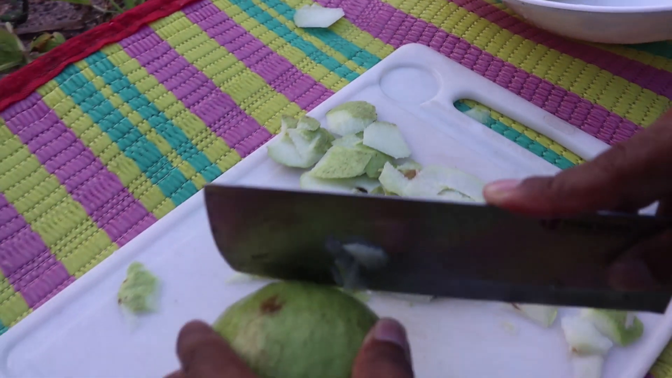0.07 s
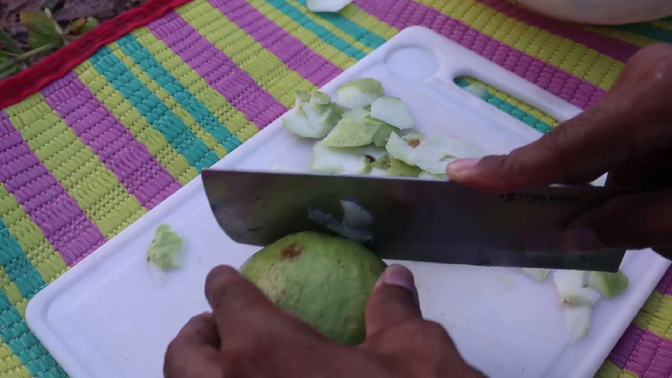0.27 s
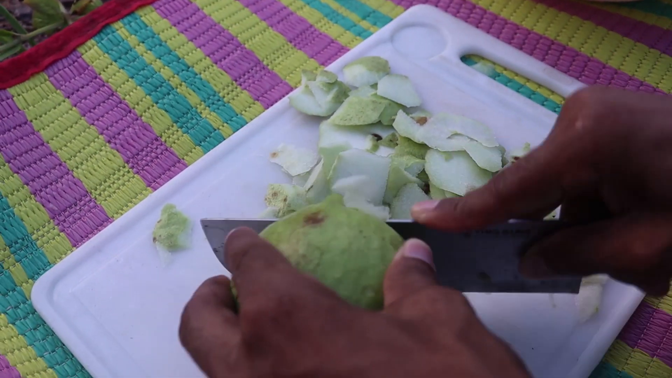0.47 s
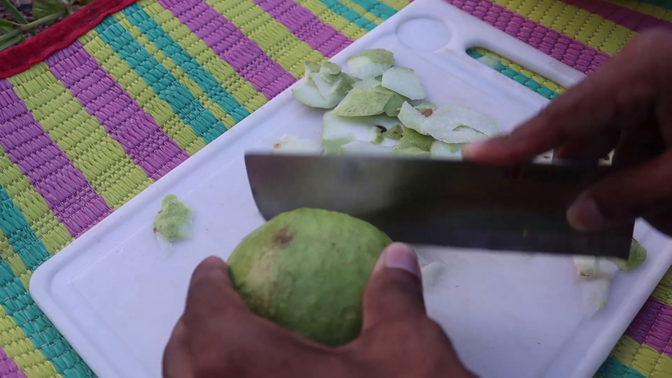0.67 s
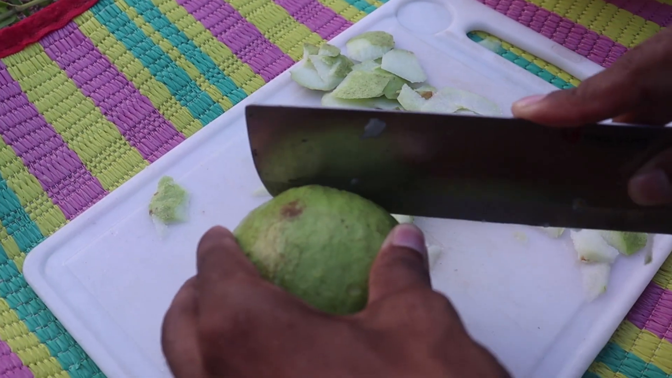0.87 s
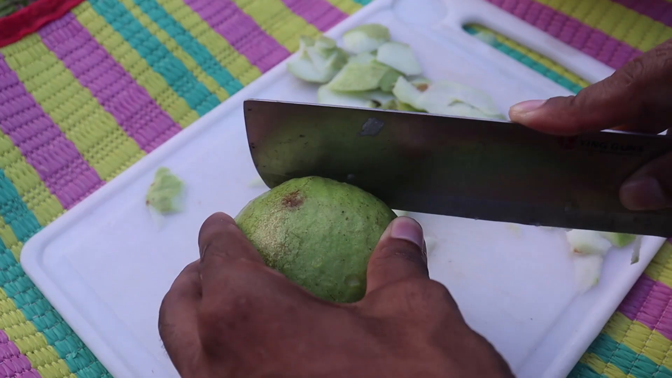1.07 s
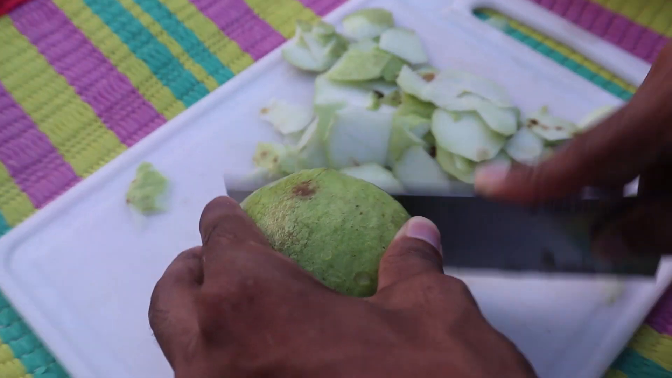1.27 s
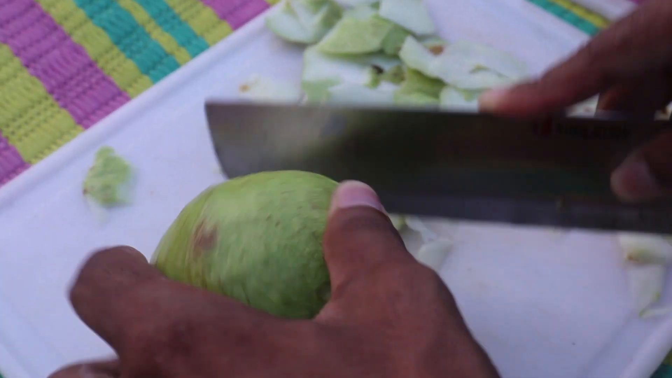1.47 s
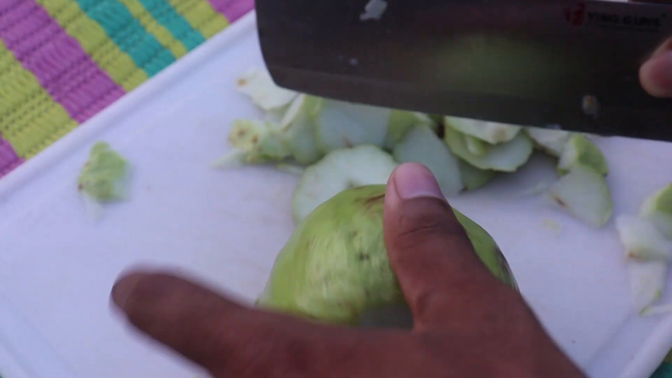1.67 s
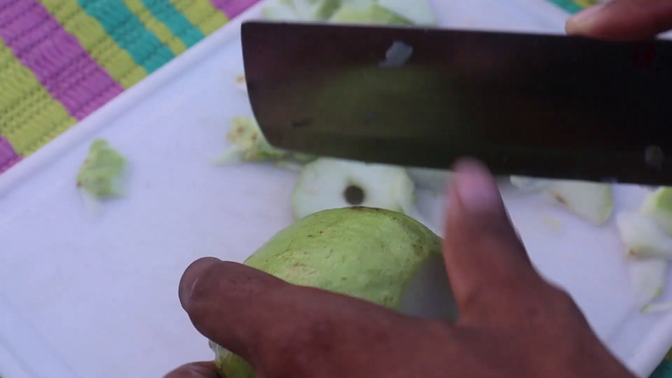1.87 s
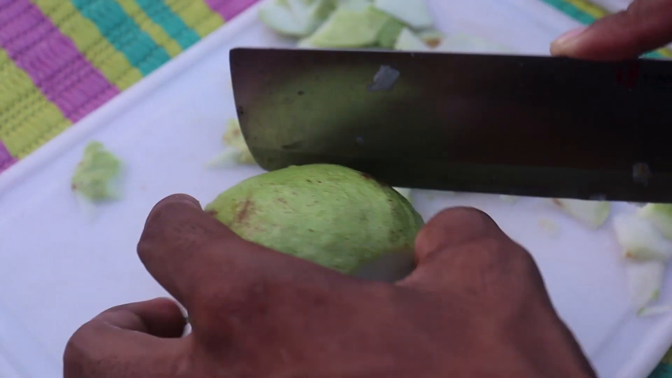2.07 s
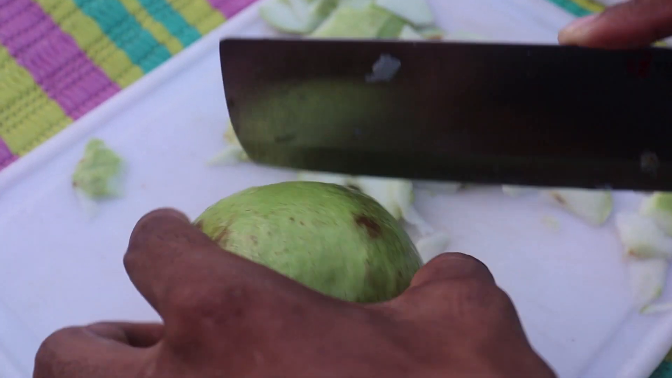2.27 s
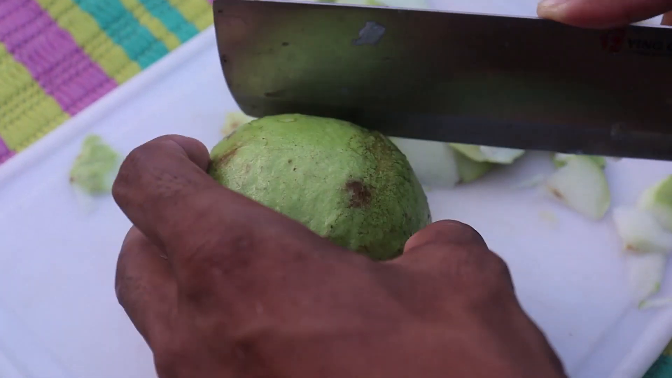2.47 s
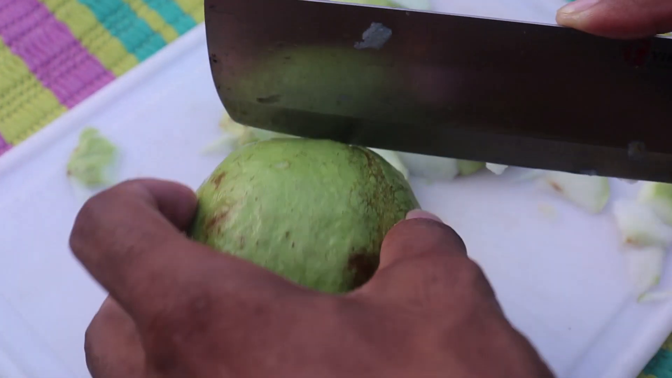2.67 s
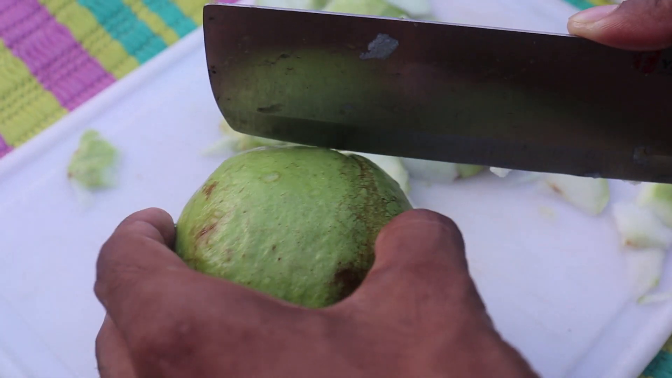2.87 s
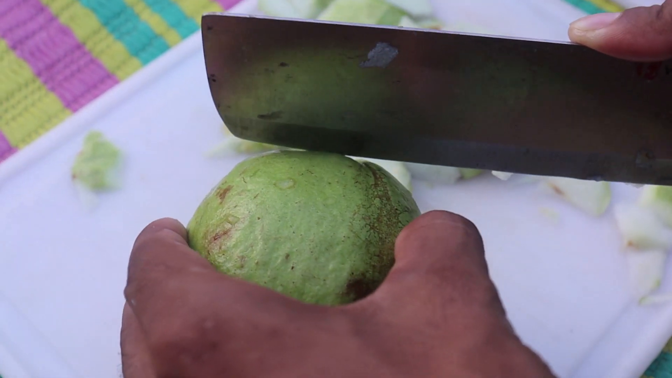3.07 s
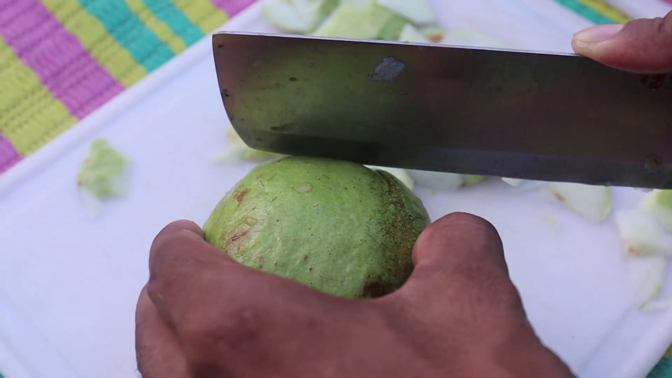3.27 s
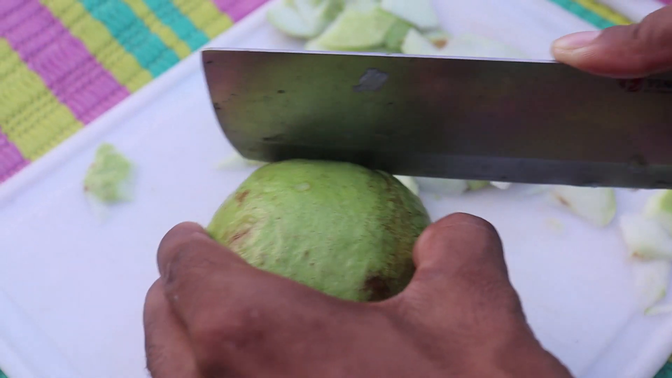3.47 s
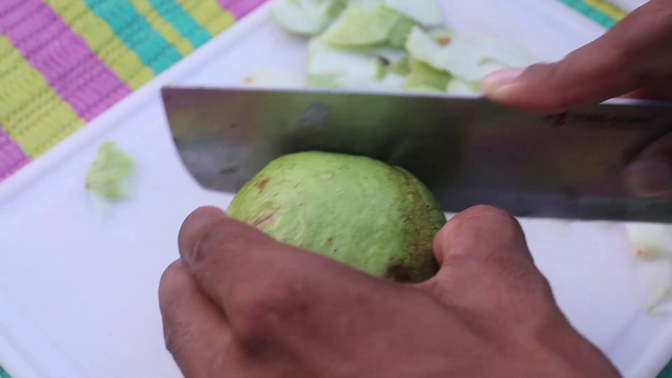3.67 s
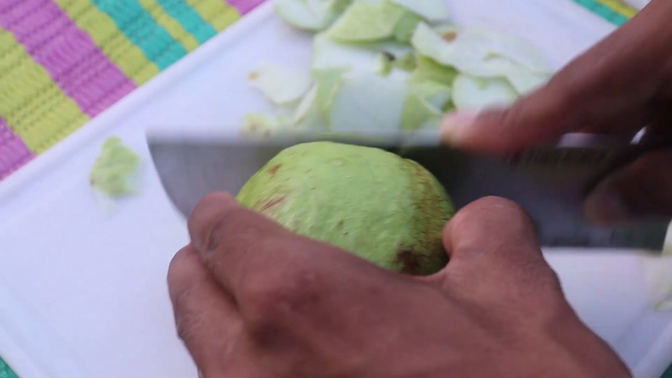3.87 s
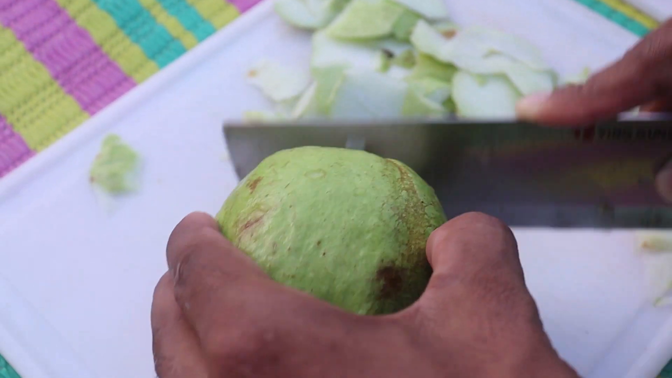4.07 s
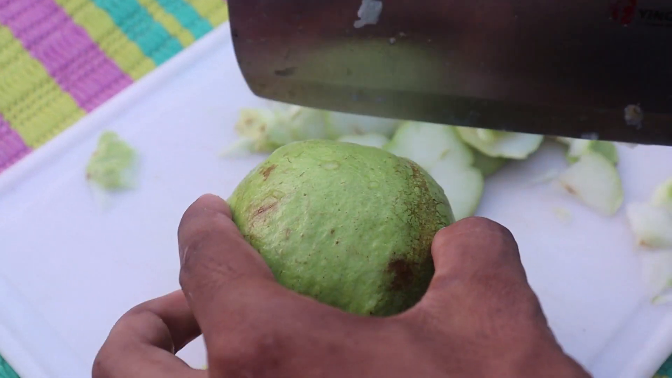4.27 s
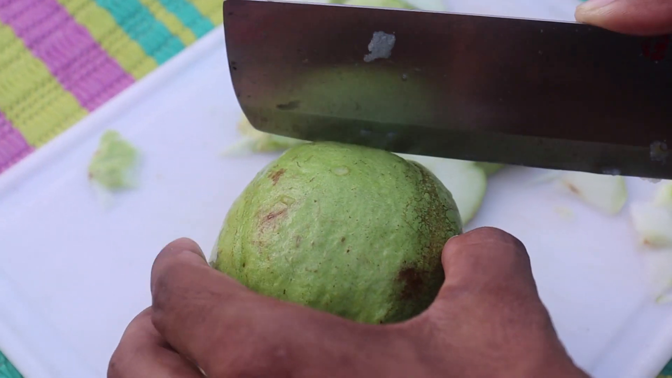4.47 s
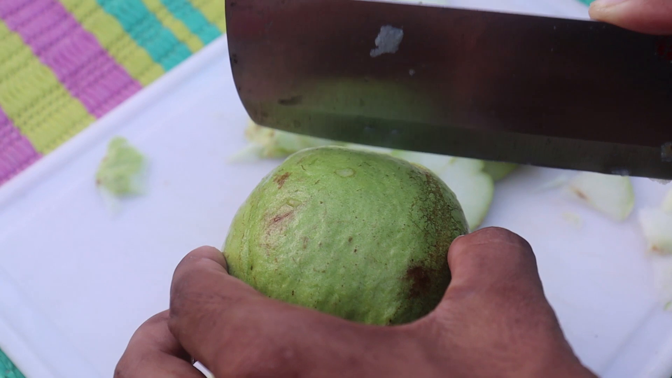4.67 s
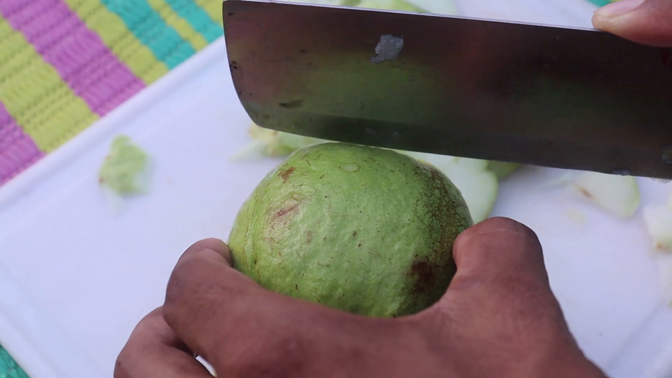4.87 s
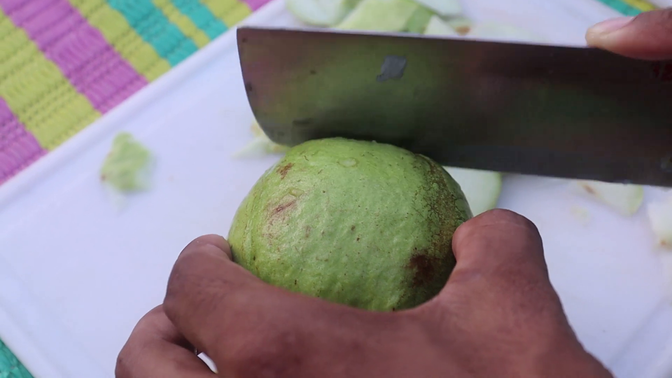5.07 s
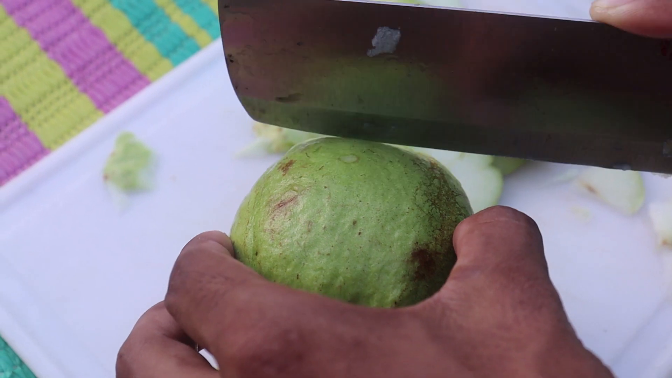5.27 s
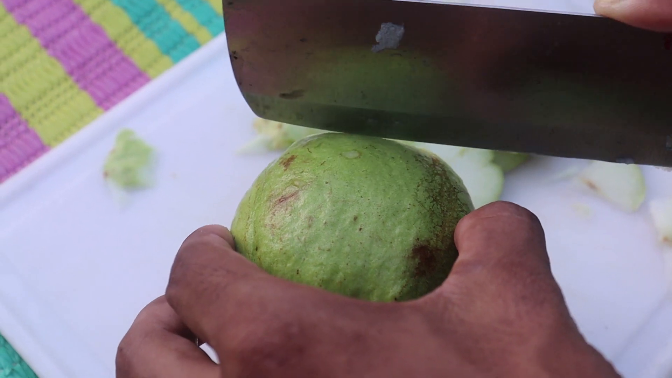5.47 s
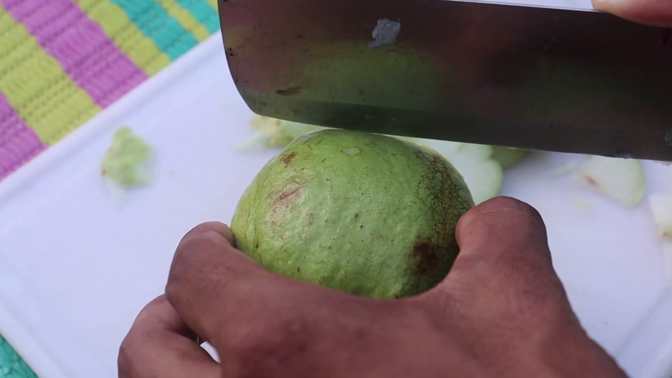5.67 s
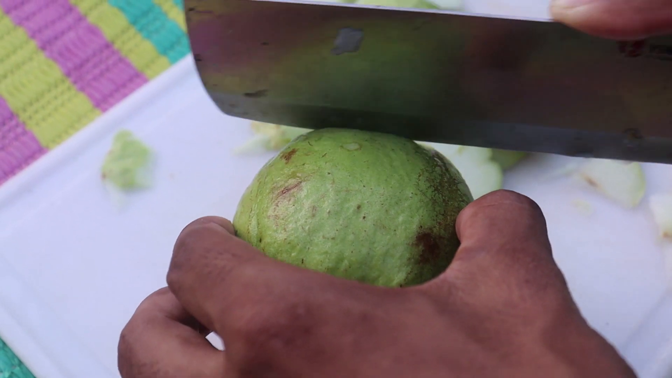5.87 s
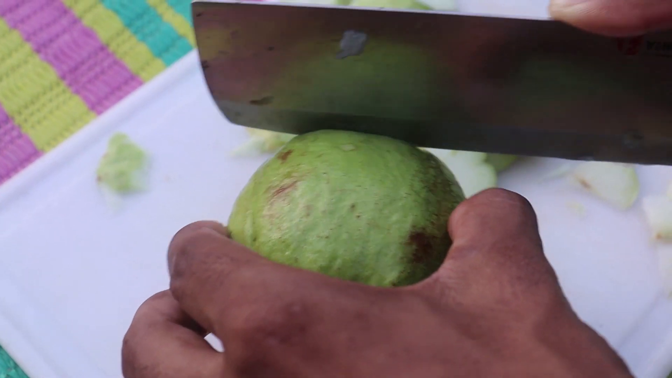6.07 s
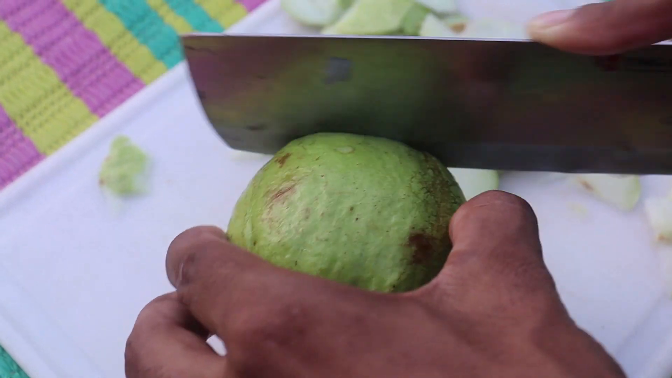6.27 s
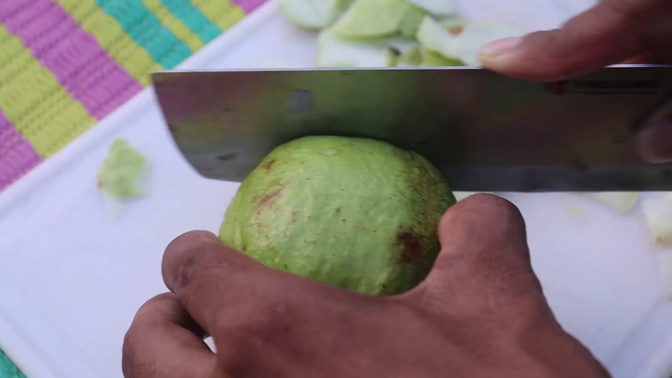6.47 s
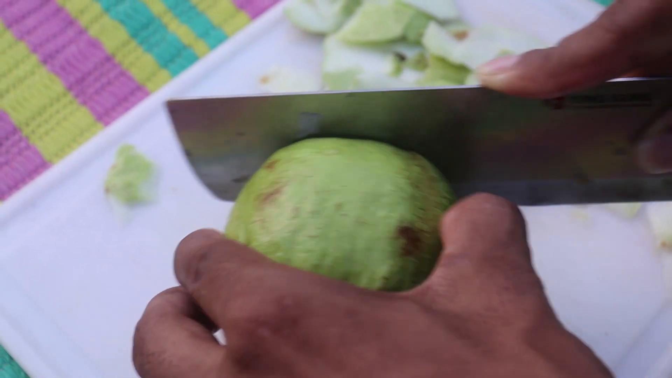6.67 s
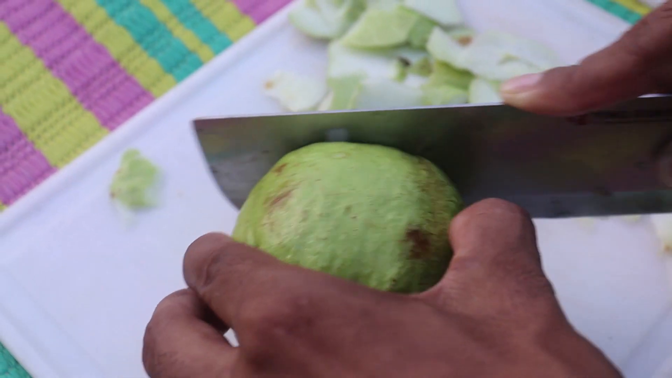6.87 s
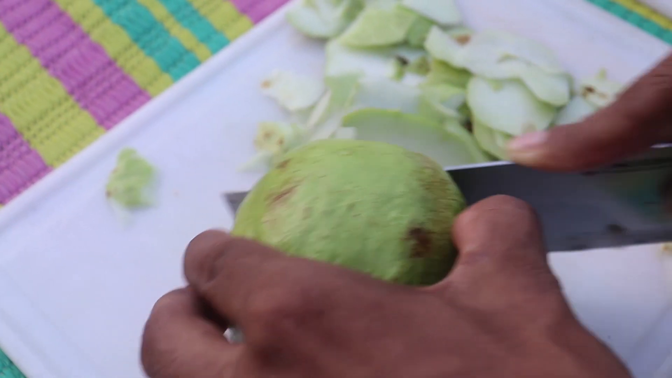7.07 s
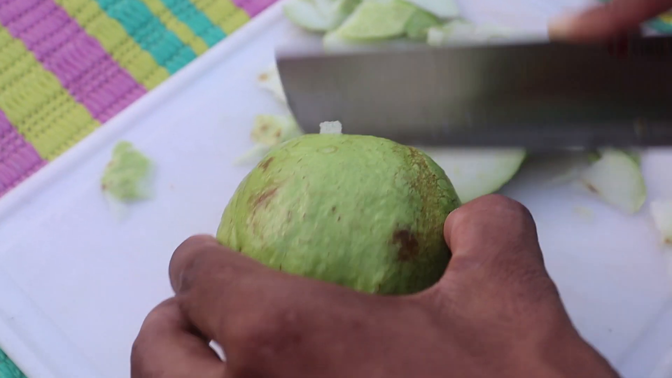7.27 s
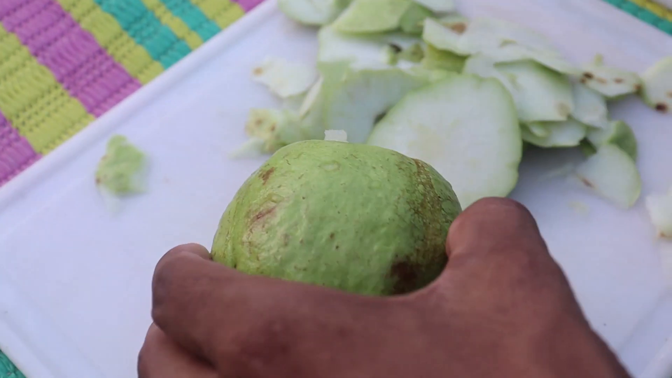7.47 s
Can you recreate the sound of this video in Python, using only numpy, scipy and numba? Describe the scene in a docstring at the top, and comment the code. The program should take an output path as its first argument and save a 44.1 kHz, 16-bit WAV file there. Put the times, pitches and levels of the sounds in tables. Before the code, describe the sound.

A broad knife hisses through crisp fruit and knocks hard on a plastic board outdoors while a hen clucks to the left and chicks peep.

```python
"""Slicing a guava in the yard

A broad knife slices a crisp guava on a plastic board that lies on a mat outdoors.
Each cut is a hiss of bursting cells; the main ones end in a skin snap and a knock of ringing board tones.
The knocks overload the camera: they clip and its limiter ducks the sound. Two taps click on its body.
A hen clucks on the left in throaty pulses and rustles dry litter; chicks peep and whistle.
Insects trill and buzz, and a faint far tone wavers, over a low rumble and a soft hiss of leaves."""
import sys
import numpy as np
from scipy import signal
from scipy.fft import rfft, irfft, next_fast_len
from scipy.io import wavfile
from scipy.ndimage import uniform_filter1d
from numba import njit

SR = 44100
rng = np.random.default_rng(int(sys.argv[2]) if len(sys.argv) > 2 else 0)


def transcribe(u):
    """Save the signal u as a 16-bit wav file named by the first command-line argument.

    u: samples, shape (n,) or (channels, n), limited to [-1, 1]; the rate is SR.
    q: integer samples, one column per channel.
    """
    v = np.clip(np.atleast_2d(u).T, -1, 1)
    q = np.round(v * 32767).astype(np.int16)
    wavfile.write(sys.argv[1], SR, q)


N = 332073  # length in samples
TIME = np.arange(N) / SR  # seconds


def amp(db):
    """Turn decibels into a gain."""
    return 10 ** (np.asarray(db) / 20)


def unit(x):
    """Scale to rms 1."""
    return x / np.sqrt(np.mean(x ** 2) + 1e-18)


def decay(t, t60):
    """Fade that falls by 60 dB in t60 seconds."""
    return np.exp(-np.log(1000) * t / t60)


def curve(rows):
    """Join (seconds, value) rows by straight lines."""
    return np.interp(TIME, *np.transpose(rows))


def add(out, s, x):
    """Mix x into out from s seconds on."""
    i = max(int(s * SR), 0)
    n = max(min(x.shape[-1], N - i), 0)
    out[..., i:i + n] += x[..., :n]


def colour(x, points):
    """Filter by a spectrum of (Hz, dB) points, joined along a logarithmic pitch scale."""
    hz, db = np.transpose(points)
    size = next_fast_len(x.shape[-1])
    f = np.maximum(np.fft.rfftfreq(size, 1 / SR), 1)
    gain = amp(np.interp(np.log(f), np.log(hz), db))
    return irfft(rfft(x, size) * gain, size)[..., :x.shape[-1]]


def resonate(x, hz, width_hz):
    """One resonance, gain 1 at its centre."""
    return signal.lfilter(*signal.iirpeak(hz, hz / width_hz, fs=SR), x)


def high_pass(x, hz):
    """Take out the bass, since small things radiate little of it."""
    return signal.sosfilt(signal.butter(2, hz, "high", fs=SR, output="sos"), x)


def wander(rate, n=N):
    """Smooth random drift with a spread near 1 and about rate new values a second."""
    k = max(int(SR / rate), 1)
    held = np.repeat(rng.standard_normal(n // k + 1), k)
    return uniform_filter1d(held, k)[:n]


def place(x, left_db, lag_ms=0):
    """Two microphones: the left one louder by left_db and earlier by lag_ms."""
    left, right = np.broadcast_to(x, (2, N))
    late_right = np.interp(TIME - lag_ms / 1000, TIME, right)
    return np.array([left * amp(left_db / 2), late_right * amp(-left_db / 2)])


def scatter(x, t60, wet_db):
    """Add a diffuse tail of fading noise, different at each microphone."""
    tail = rng.standard_normal((2, SR)) * decay(TIME[:SR], t60)
    tail /= np.sqrt(np.sum(tail ** 2, axis=1, keepdims=True))
    wet = signal.fftconvolve(np.broadcast_to(x, (2, N)), tail, axes=1)[:, :N]
    return x + amp(wet_db) * wet


def grains(rate, spread_db, own_db):
    """Dense tiny clicks of unequal size; each microphone also catches some of its own."""
    size = amp(spread_db * np.minimum(rng.exponential(size=(3, N)), 5))
    happens = rng.random((3, N)) < rate / SR
    clicks = rng.standard_normal((3, N)) * size * happens
    return clicks[0] + amp(own_db) * clicks[1:]


def swells(rows, peak_share, power):
    """Rounded rises and falls from (start, length, dB) rows, peaking at a share of their length."""
    shape = np.array([0, np.clip(peak_share, .02, .98), 1])
    total = np.zeros(N)
    for s, length, db in rows:
        ramp = np.interp(TIME, s + length * shape, [0, 1, 0])
        total += amp(db) * np.sin(np.pi / 2 * ramp) ** power
    return total


def ringing(modes):
    """Surface velocity of an object after an impulse: a sum of fading tones."""
    t = TIME[:SR // 10]
    return sum(amp(db) * np.cos(2 * np.pi * hz * t) * decay(t, t60) for hz, db, t60 in modes)


def strike(blows, modes, crack_db, crack_t60, lowest_hz):
    """Each blow rings the modes and cracks briefly; a longer contact dulls both."""
    out, ring = np.zeros(N), ringing(modes)
    t = TIME[:len(ring)]
    noises = rng.standard_normal((len(blows), len(t)))
    for (s, db, contact_ms, boom_db), noise in zip(blows, noises):
        push = np.sin(np.pi * np.minimum(t[:SR // 200] * 1000 / contact_ms, 1))  # half a sine wave
        crack = amp(crack_db) * high_pass(noise, 2800) * decay(t, crack_t60)
        hit = high_pass(np.convolve(ring + crack, push), lowest_hz)
        hit = hit + (amp(boom_db) - 1) * resonate(hit, 534, 330)  # depends on where the blow lands
        add(out, s, -amp(db) * hit / np.abs(hit).max())
    return out


# The blade moving through or along the fruit.
# Each row: start in seconds, length in seconds, level in dB before the catch and slip.
STROKE_MOVES = [(.235, 0.13, -36.5), (.498, 0.11, -29), (1.125, 0.21, -45.5), (1.325, 0.079, -25),
                (3.42, .045, -42), (3.715, 0.11, -26.5), (3.93, 0.11, -28.5), (4.97, 0.07, -44),
                (5.94, 0.1, -41), (6.105, 0.06, -42.5), (6.201, 0.1, -35), (6.35, 0.082, -38),
                (6.467, 0.097, -32), (6.578, 0.074, -37.5), (6.677, 0.09, -33), (6.778, 0.077, -35.5),
                (6.873, 0.084, -36), (6.972, 0.081, -39), (7.085, 0.12, -27.5), (7.272, 0.065, -40),
                (7.36, 0.033, -43)]
# The last of the skin tears. Each row: start in seconds, length in seconds, level in dB before placing.
SKIN_SNAPS = [(.5725, 0.01, -11), (3.9985, 0.01, -14), (7.163, 0.0089, -14.5)]
# Tone colour of the bursting flesh. Each row: frequency in Hz, relative level in dB.
FLESH_SPECTRUM = [(350, -39), (600, -7), (778, 1.5), (904, -5.5), (1480, -0.5), (1870, -10), (2290, -2),
                  (2770, -6), (3960, -8.5), (5890, -9.5), (6390, -5.5), (9370, -11), (15100, -10.5),
                  (15800, -13)]
# Resonances of the tearing skin and blade. Each row: centre in Hz, width in Hz, relative level in dB.
TEAR_RESONANCES = [(2080, 880, -11), (4060, 1350, 3), (7340, 1700, -1.5), (9050, 2200, -27)]
# How hard the cut pinches the blade.
# Each row: time in seconds, level of the rub in dB relative to the smoothed strokes.
BLADE_PINCH = [(.3, -1), (.55, -19), (5.95, -17), (6.3, -1.5), (6.8, -19), (7, -16), (7.15, -6)]
# The wet blade keeps sliding around each stroke: for this long (s), this far below it (dB)
SLIDE_S, SLIDE_DB = 0.094, -17.5
# Coarse crunch: larger cell walls per second, their spread (dB) and level against the fine cells (dB)
CRUNCH_PER_S, CRUNCH_SPREAD_DB, CRUNCH_DB = 500, 2.5, -8


def cutting():
    """Cells burst by the thousand as the blade moves; its flat rubs; the skin gives way in a ringing snap."""
    cells = unit(grains(rate=9000, spread_db=1.5, own_db=1.5))
    walls = unit(grains(rate=CRUNCH_PER_S, spread_db=CRUNCH_SPREAD_DB, own_db=-3))
    hiss = unit(colour(cells + amp(CRUNCH_DB) * walls, FLESH_SPECTRUM))

    bursts = grains(rate=17000, spread_db=5.5, own_db=6.0)
    tear = unit(sum(amp(db) * resonate(bursts, hz, width_hz) for hz, width_hz, db in TEAR_RESONANCES))

    drag = amp(1.7 * wander(130))  # the blade catches and slips
    # a stroke gathers speed and stops more quickly
    strokes = drag * swells(STROKE_MOVES, peak_share=0.61, power=1.14)
    slide = uniform_filter1d(strokes, int(SLIDE_S * SR))
    force = strokes / strokes.max()  # harder strokes also ring the resonances
    snaps = swells(SKIN_SNAPS, peak_share=0.65, power=0.85)
    hissing = hiss * (strokes + amp(SLIDE_DB) * slide)
    tearing = tear * (snaps + amp(-4.0) * strokes * force)

    friction = grains(rate=3800, spread_db=4.0, own_db=-3)
    rub = unit(resonate(resonate(friction, 1450, 260), 1550, 330))
    return place(hissing + tearing, left_db=-3) + rub * slide * amp(curve(BLADE_PINCH))


# Blows of blade and slices on the board. Each row: start in seconds, peak in dB, boom included,
# before the glancing echo, contact in milliseconds, gain in dB of the hollow boom near 534 Hz.
BOARD_KNOCKS = [(.5903, 16, 0.46, -5.5), (.695, -18, 0.2, 6), (.978, -20.5, 0.21, 2),
                (1.405, 15.5, 0.41, 0.5), (1.473, -20, 0.42, 5), (4.0108, 16, 0.39, -6),
                (4.108, -18, 0.4, 13), (7.1713, 14.5, 0.49, -0.5), (7.266, -12, 0.16, 2),
                (7.287, -14.5, 0.78, 0), (7.3035, -7, 0.85, 16)]
# Tones of the board, damped by the mat.
# Each row: frequency in Hz, relative level in dB, time to fade by 60 dB in seconds.
BOARD_MODES = [(249, -10.5, 0.05), (329, -10.5, .043), (423, -7, 0.034), (600, -8, .021), (653, 3.5, 0.032),
               (829, 4, 0.017), (1015, 5.5, 0.017), (1196, 0, 0.014), (1740, -29, 0.013), (2350, -9, .016),
               (3350, -15.5, .024), (3850, -9, .015), (4550, -10, .016)]
# Cut slices sliding and toppling on the board.
# Each row: start in seconds, length in seconds, level in dB before the glancing echo.
SLICE_TUMBLES = [(7.208, 0.057, -31), (7.282, 0.073, -22.5)]


def board():
    """Short plastic knocks straight ahead, and the patter of falling slices through the same modes."""
    knocks = strike(BOARD_KNOCKS, BOARD_MODES, crack_db=6.5, crack_t60=0.029, lowest_hz=230)
    drops = grains(rate=2600, spread_db=1, own_db=-12)[0]
    patter = unit(signal.fftconvolve(drops, ringing(BOARD_MODES))[:N])
    direct = knocks + patter * swells(SLICE_TUMBLES, peak_share=0.12, power=0.87)
    # off blade and hands: a diffuse tail takes over much of the treble
    glancing = scatter(high_pass(direct, 1057), t60=0.027, wet_db=-4.5) - high_pass(direct, 925)
    return direct + glancing


# Small wet ticks of the cut fruit. Each row: start in seconds, peak in dB before a 6 dB cut.
WET_TICKS = [(0.2537, -41), (0.382, -29.5), (1.2673, -18), (2.4962, -23), (2.9824, -27), (3.29, -16),
             (3.524, -24.5), (5.342, -22.5), (5.702, -29), (5.9304, -26), (7.2659, -21)]


def ticks():
    """Single fibres and sticky juice let go in quick fading bits of noise."""
    out, t = np.zeros((2, N)), TIME[:SR // 50]
    noises = rng.standard_normal((len(WET_TICKS), 2, len(t)))
    for (s, db), noise in zip(WET_TICKS, noises):
        tick = resonate(noise * decay(t, 0.022), 2400, 8900)
        add(out, s, amp(db - 6.0) * tick / np.abs(tick).max())
    return out


# Fingers turning and gripping the fruit. Each row: start in seconds, length in seconds, level in dB.
FINGER_GRIPS = [(2.175, 0.043, -37), (2.3, 0.21, -46), (2.48, 0.088, -46), (2.58, 0.17, -59),
                (2.795, 0.035, -51), (3.09, 0.09, -53), (3.53, 0.22, -51)]
# Tone colour of skin on peel. Each row: frequency in Hz, relative level in dB.
PEEL_SPECTRUM = [(200, -24), (700, 4), (1600, 0), (3000, -5), (6000, -9), (10000, -13.5), (16000, -15)]
# Soft dull bumps on the mat and the ground. Each row: start in seconds, length in seconds, level in dB.
SOFT_THUDS = [(2.49, 0.044, -35), (4.442, 0.019, -28.5), (4.49, 0.01, -32)]


def handling():
    """Sticky fingers crackle on the peel; now and then something bumps softly."""
    stray = unit(colour(grains(rate=110, spread_db=1.0, own_db=-2), PEEL_SPECTRUM))
    grip = unit(colour(grains(rate=550, spread_db=3.0, own_db=1.5), PEEL_SPECTRUM))
    gripping = grip * swells(FINGER_GRIPS, peak_share=.4, power=1.25)
    dull = unit(resonate(resonate(rng.standard_normal(N), 170, 490), 190, 600))
    bumps = dull * swells(SOFT_THUDS, peak_share=0.32, power=0.62)
    return amp(-60.0) * stray + gripping + bumps


# Taps on the camera beside its right microphone. Each row: start in seconds, peak in dB, boom included,
# before placing and a 6.5 dB cut, contact in milliseconds, gain in dB of the hollow boom near 534 Hz.
CASE_TAPS = [(6.018, 4, 0.15, -10), (6.249, 0.5, 0.6, -8)]
# Tones of the camera body.
# Each row: frequency in Hz, relative level in dB, time to fade by 60 dB in seconds.
CASE_MODES = [(800, -1.5, 0.0097), (980, -13, 0.0094), (1490, 3, 0.0031), (1800, -14, 0.055),
              (2630, -12, 0.0055), (3040, -7, 0.0081), (4680, -6, .006)]


def camera_taps():
    """The body of the camera clicks, much louder in the nearer microphone."""
    taps = strike(CASE_TAPS, CASE_MODES, crack_db=3, crack_t60=0.0069, lowest_hz=610)
    placed = place(taps, left_db=-16) * amp(-6.5)
    return high_pass(scatter(placed, t60=0.037, wet_db=-7.5), 520)


# The hen's calls. Each row: middle in seconds, length in seconds, level in dB before a 5.5 dB cut
# and placing, top pitch in Hz before jitter, throat resonance in Hz.
HEN_CLUCKS = [(1.254, 0.031, -34, 377, 1090), (1.558, 0.046, -34, 524, 1090),
              (1.87, 0.028, -29, 348.7, 1100), (2.086, 0.025, -25.5, 344, 1290),
              (2.281, 0.029, -29, 392.7, 980), (2.551, 0.04, -27.5, 392, 1120),
              (2.924, 0.032, -22.5, 366.4, 1200), (3.186, 0.034, -26, 407, 1270),
              (3.461, 0.033, -22.5, 431, 1146), (3.753, 0.016, -21, 358, 1150),
              (4.211, 0.016, -38, 370, 1060), (4.243, 0.023, -27, 575, 1040),
              (4.417, 0.015, -23, 465, 1210), (4.52, 0.037, -16, 1039, 1150),
              (4.678, 0.044, -13.5, 1117, 1180), (4.828, 0.042, -16, 462, 1230),
              (4.942, 0.04, -30, 334.7, 920), (5.183, 0.012, -39.5, 336, 1030),
              (5.507, 0.039, -29, 343.6, 970)]
# The pitch arches up from near this low edge; its top comes early (share of half a cluck)
CLUCK_EDGE_HZ, CLUCK_LEAD = 280, 0.13
# The beak opens with effort: its resonance and rasp in the loudest cluck, dB lost per dB of softer call
BEAK_DB, RASP_DB, BEAK_SLOPE = 4, -26.5, 3.1
# Unsteadiness of the pitch (share) and noise in each pulse (share)
CLUCK_JITTER, CLUCK_NOISE = .04, .6


def hen():
    """Each cluck is a run of rough pulses whose pitch arches, ringing the throat; loud ones open the beak."""
    out = np.zeros(N)
    loudest = max(row[2] for row in HEN_CLUCKS)
    for s, length, db, top_hz, throat_hz in HEN_CLUCKS:
        n = int(length * SR)
        u = np.linspace(-1, 1, n)  # -1 at the start, 1 at the end
        jitter = 1 + CLUCK_JITTER * wander(329, SR // 10)[:n]
        arch = np.cos(np.pi / 2 * (u + CLUCK_LEAD)).clip(0) ** .8
        pitch = (CLUCK_EDGE_HZ + (top_hz - CLUCK_EDGE_HZ) * arch) * jitter
        phase = 2 * np.pi * np.cumsum(pitch) / SR
        pulses = unit(sum(np.cos(k * phase) for k in range(1, 14)))
        breath = CLUCK_NOISE * rng.standard_normal(SR // 10)[:n] * (1 + np.cos(phase))
        source = (pulses + breath) * np.cos(np.pi / 2 * u).clip(0)
        source = np.pad(source, (0, SR // 100))  # room to ring out
        throat = resonate(resonate(source, throat_hz, 550), throat_hz, 660)
        beak = resonate(resonate(source, 1770, 420), 1960, 440)
        chest = resonate(resonate(source, 782, 200), 682, 220)
        rasp = resonate(source, 5000, 2100)
        opening = amp(BEAK_SLOPE * (db - loudest))
        call = throat + amp(-5.5) * chest + opening * (amp(BEAK_DB) * beak + amp(RASP_DB) * rasp)
        add(out, s - length / 2, amp(db - 5.5) * unit(call))
    return scatter(place(out, left_db=5.5, lag_ms=.18), t60=0.24, wet_db=-12.5)


# The hen shuffles about. Each row: start in seconds, length in seconds, level in dB before placing.
HEN_SHUFFLE = [(4.3, 0.72, -42.5)]
# Her foot rakes the litter. Each row: start in seconds, length in seconds, level in dB before placing.
FOOT_SCRATCHES = [(4.442, 0.017, -34), (4.49, 0.034, -35.5), (4.615, 0.022, -34.5)]
# Tone colour of the dry leaves. Each row: frequency in Hz, relative level in dB.
LEAF_SPECTRUM = [(500, -4), (1500, -1), (2500, -7), (4300, -6.5), (6500, -12.5), (10000, -16.5),
                 (16000, -28)]


def litter():
    """Dry leaves crackle under the hen's feet: a soft shuffle and a few quick scratches."""
    crackle = unit(colour(grains(rate=2000, spread_db=3.0, own_db=7), LEAF_SPECTRUM))
    shuffle = swells(HEN_SHUFFLE, peak_share=0.51, power=1.2)
    scratches = swells(FOOT_SCRATCHES, peak_share=0.1, power=0.9)
    return place(crackle * (shuffle + scratches), left_db=3.5)


def whistle(hz):
    """A thin, slightly unsteady tone on a pitch track."""
    unsteady = hz * (1 + .022 * wander(350, SR // 4)[:len(hz)])
    return np.sin(2 * np.pi * np.cumsum(unsteady) / SR)


# Short arched peeps. Each row: start in seconds, length in seconds, top pitch in Hz,
# level in dB before placing.
CHICK_PEEPS = [(1.558, 0.047, 2690, -46), (1.702, 0.055, 2570, -45.5), (4.426, 0.032, 2960, -42),
               (4.584, 0.072, 2760, -46), (6.746, 0.067, 3000, -51), (6.823, 0.051, 2550, -40.5),
               (6.869, 0.038, 2860, -38), (7.023, 0.06, 2550, -44), (7.055, 0.039, 3030, -47),
               (7.512, 0.028, 2560, -40.5)]
# Falling whistles. Each row: start in seconds, length in seconds, first pitch in Hz, last pitch in Hz,
# level in dB before placing.
CHICK_WHISTLES = [(1.507, 0.017, 5450, 3080, -36), (1.841, 0.17, 4870, 2590, -47),
                  (5.747, 0.17, 4510, 2580, -50), (7.396, 0.1, 7280, 3040, -38.5)]
# A peep tops out at this share of its length; its pitch bends down either side
PEEP_TOP_SHARE, PEEP_BEND = .55, .4
# A whistle drops fast, then levels off: power of the fall, share of its length for the attack
# (and the release), and the extra fade by its end (dB)
WHISTLE_FALL, WHISTLE_ATTACK, WHISTLE_FADE_DB = 2.7, 0.14, -17


def chicks():
    """Arched peeps and falling whistles are sliding pure tones, blurred by the yard."""
    out = np.zeros(N)
    for s, length, top_hz, db in CHICK_PEEPS:
        u = np.linspace(0, 1, int(length * SR))
        pitch = top_hz * (1 - PEEP_BEND * (u - PEEP_TOP_SHARE) ** 2)
        add(out, s, amp(db) * np.sin(np.pi * u).clip(0) ** 0.82 * whistle(pitch))
    for s, length, first_hz, last_hz, db in CHICK_WHISTLES:
        u = np.linspace(0, 1, int(length * SR))
        pitch = last_hz + (first_hz - last_hz) * (1 - u) ** WHISTLE_FALL
        edges = np.minimum(np.minimum(u, 1 - u) / WHISTLE_ATTACK, 1)
        add(out, s, amp(db) * edges * amp(WHISTLE_FADE_DB * u ** 2) * whistle(pitch))
    return scatter(place(out, left_db=1.5), t60=.54, wet_db=-3.5)


# An insect's short buzzes. Each row: start in seconds, length in seconds, level in dB.
INSECT_BUZZES = [(.36, .22, -61), (1.56, .22, -65), (2.59, 0.24, -62), (3.5, 0.36, -61)]


def insects():
    """Narrow bands of noise: one lasting trill that flickers, and a higher one in short bursts."""
    trill = unit(resonate(resonate(rng.standard_normal((2, N)), 6940, 450), 6940, 450))
    high = unit(resonate(resonate(rng.standard_normal((2, N)), 8450, 500), 8450, 500))
    flicker = amp(2 * wander(90))
    return amp(-63) * trill * flicker + high * swells(INSECT_BUZZES, peak_share=.6, power=.3)


# A faint far-off tone. Each row: start in seconds, length in seconds, level in dB before it wavers.
FAR_TONE = [(4.9, 1.57, -54)]


def hum():
    """A faint tone far away, near 362 Hz, wavering in pitch and level."""
    pitch = 362 * (1 + .015 * wander(25))
    tone = unit(np.sin(2 * np.pi * np.cumsum(pitch) / SR))
    return tone * swells(FAR_TONE, peak_share=0.21, power=0.69) * amp(1.9 * wander(13))


# Tone colour of the outdoor air. Each row: frequency in Hz, relative level in dB.
AIR_SPECTRUM = [(15, -69), (25, -17.5), (70, -1), (170, -2), (324, -6.5), (361, -7), (402, -12), (436, -12),
                (1010, -20.5), (1470, -26.5), (3980, -34), (4430, -33.5), (5500, -36.5), (6830, -38.5),
                (15800, -40)]
# Width of the air. Each row: frequency in Hz, level in dB of the left-right difference against the middle.
AIR_WIDTH = [(60, -28.5), (250, -14.5), (600, -6), (1500, 2), (4000, 2.5), (15000, 0.5)]
# The breeze in the leaves. Each row: time in seconds, dB added to the air above 800 Hz.
LEAF_BREEZE = [(0, 5), (1, -2), (2, 0.5), (2.6, -2), (4.3, 0), (5.3, -4.5), (7.5, -4.5)]


def air():
    """Distant rumble, alike in both microphones, under a soft wide hiss of leaves; both are shaped noise."""
    mid, side = colour(rng.standard_normal((2, N)), AIR_SPECTRUM)
    difference = colour(side, AIR_WIDTH) * np.array([[1], [-1]])
    both = (mid + difference) / np.std(mid) * amp(-41)
    low = signal.sosfiltfilt(signal.butter(2, 800, fs=SR, output="sos"), both)
    rumble = low * amp(1.16 * wander(8.1))
    flutter_db = 1.4 * wander(22)  # the leaves flutter
    return rumble + (both - low) * amp(curve(LEAF_BREEZE) + flutter_db)


def scene():
    """The kitchen work in front, the yard around it."""
    work = cutting() + board() + ticks() + handling() + camera_taps()
    return work + hen() + litter() + chicks() + insects() + hum() + air()


@njit
def limiter_gain(peak, top, attack_s, hold_s, release_s):
    """The gain dives after an overload, waits, then climbs back."""
    out, held, age, gain = np.empty(len(peak)), 0., 0., 1.
    for i in range(len(peak)):
        age += 1 / SR
        if peak[i] > held:
            held, age = peak[i], 0.
        elif age > hold_s:
            held *= 1 - 1 / (release_s * SR)
        gain += (top / max(held, top) - gain) / (attack_s * SR)
        out[i] = gain
    return out


def record(dry):
    """The limiter is too slow for the first swings of a knock, which clip; the top is cut at 15.8 kHz."""
    peak = np.minimum(np.abs(dry).max(axis=0), amp(12.5))  # the detector saturates
    gain = limiter_gain(peak, top=1.0, attack_s=0.0014, hold_s=0.034, release_s=0.097)
    clipped = np.clip(dry * gain, -1, 1)
    return signal.sosfilt(signal.ellip(10, .2, 70, 15800, fs=SR, output="sos"), clipped)


dry = scene()
out = record(dry)
transcribe(out)
```